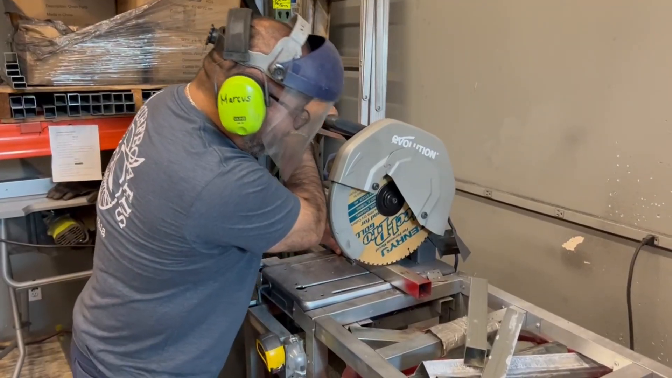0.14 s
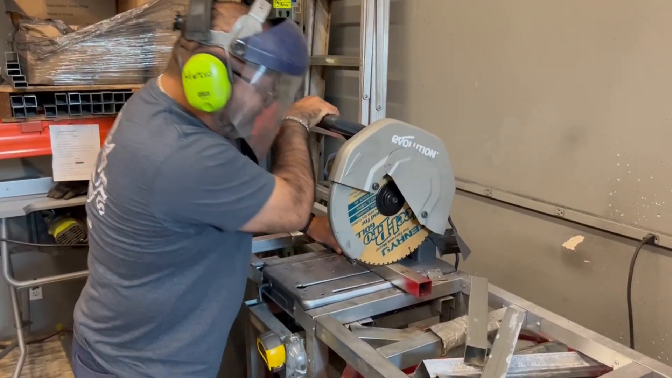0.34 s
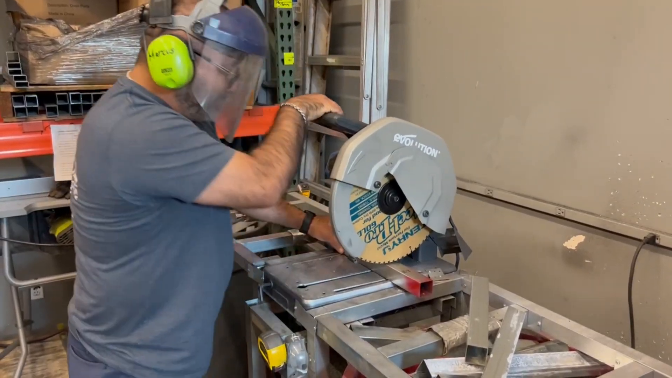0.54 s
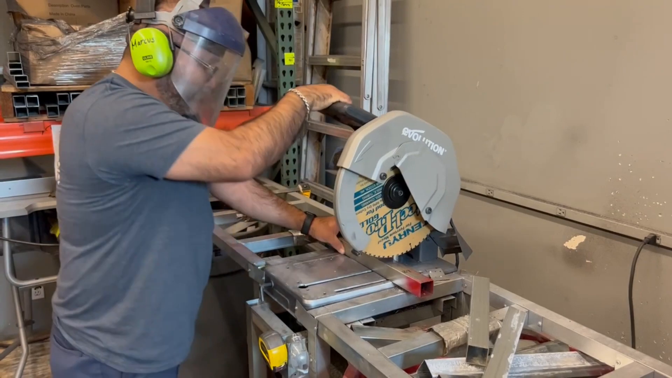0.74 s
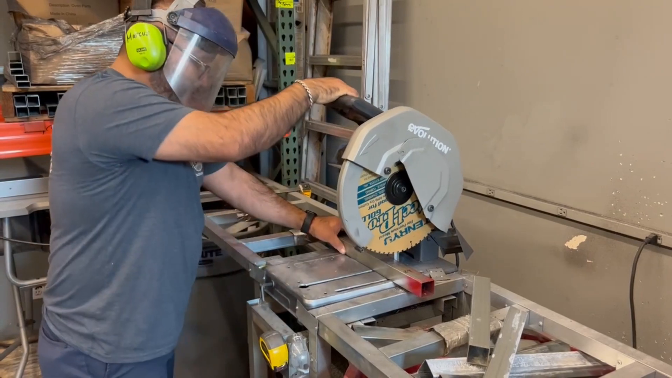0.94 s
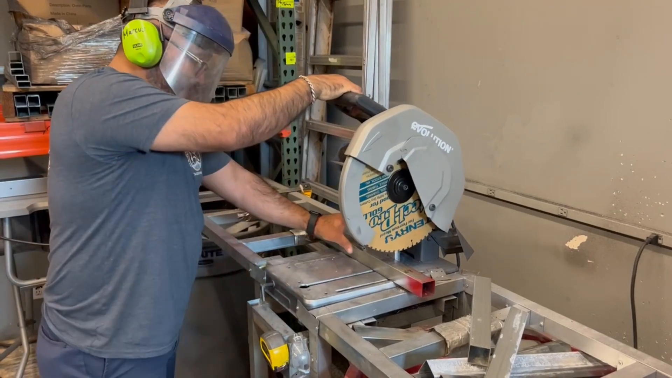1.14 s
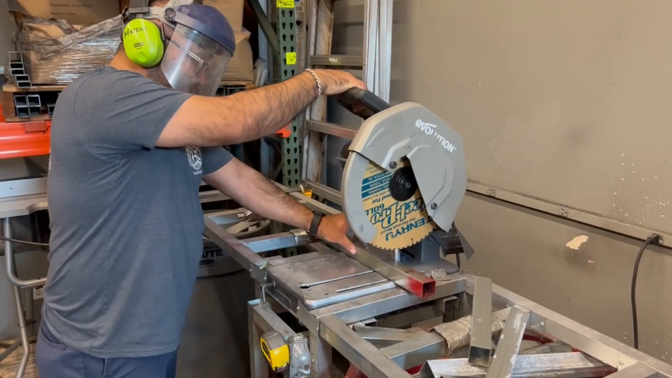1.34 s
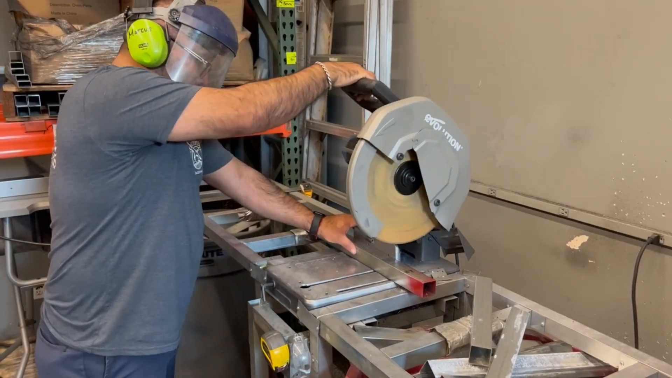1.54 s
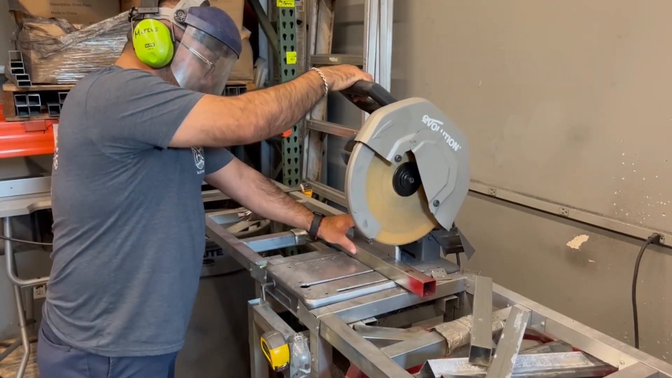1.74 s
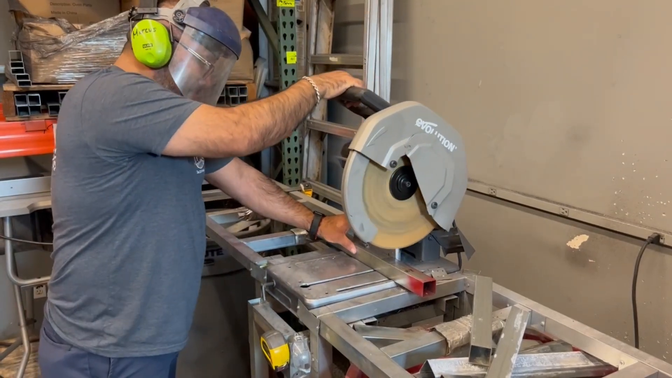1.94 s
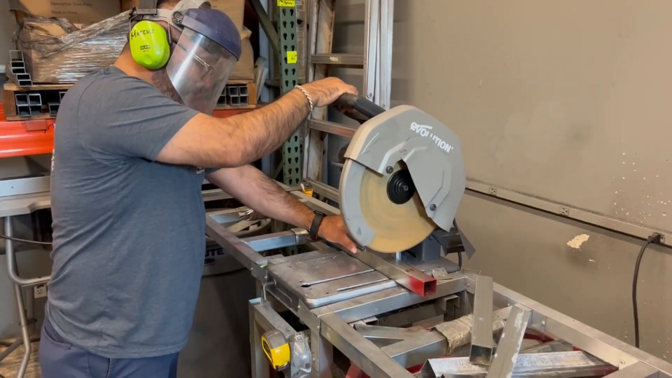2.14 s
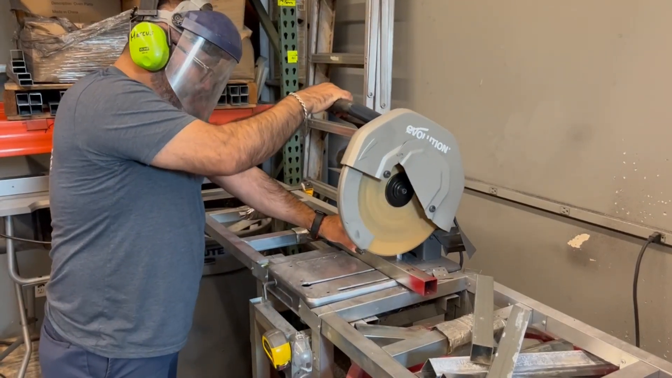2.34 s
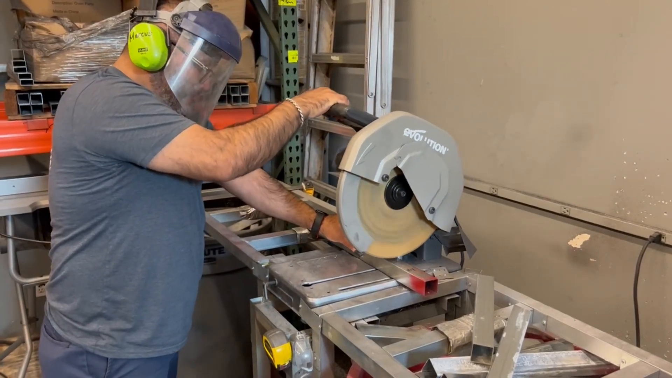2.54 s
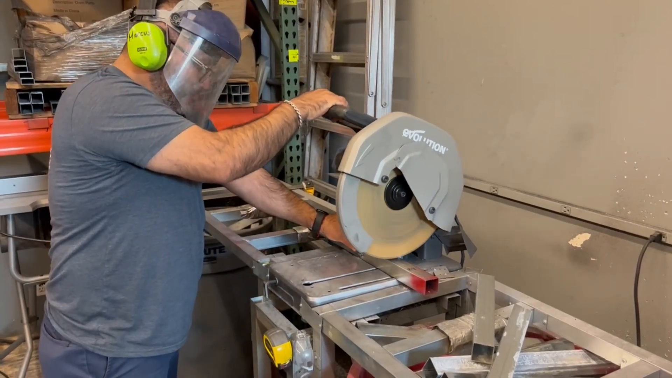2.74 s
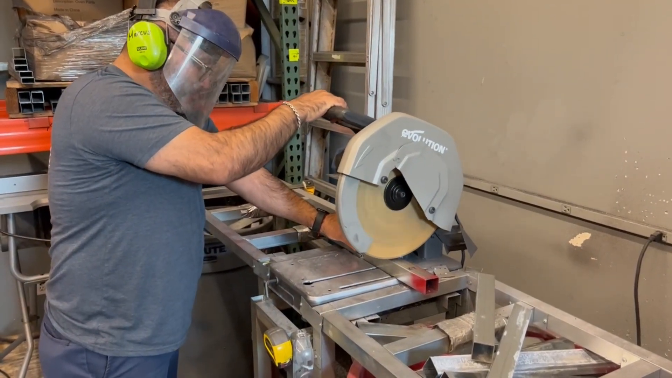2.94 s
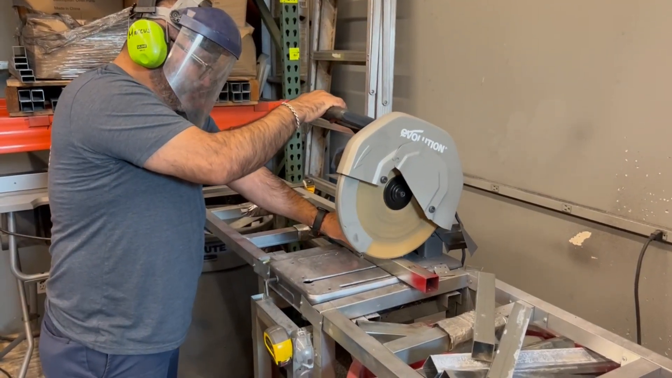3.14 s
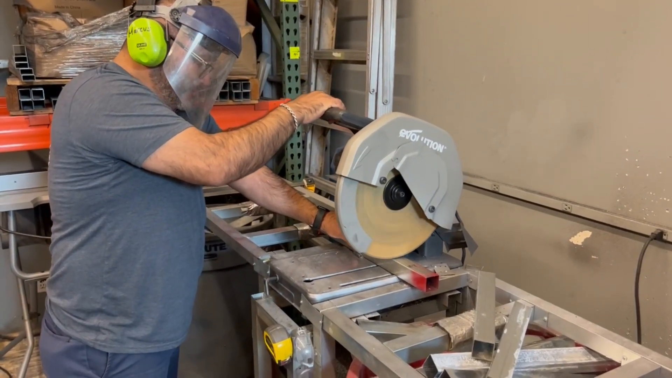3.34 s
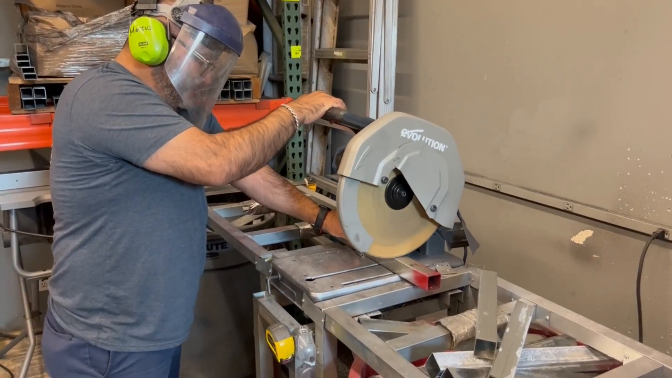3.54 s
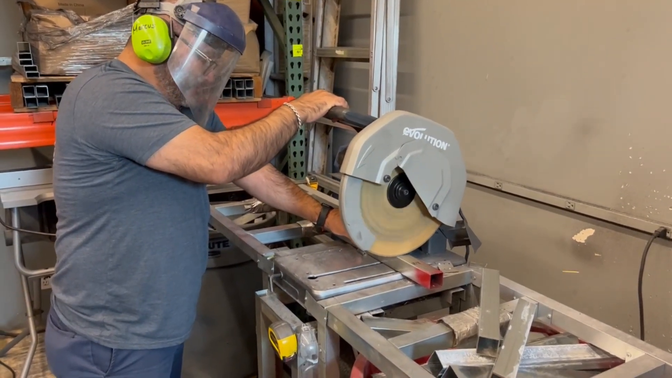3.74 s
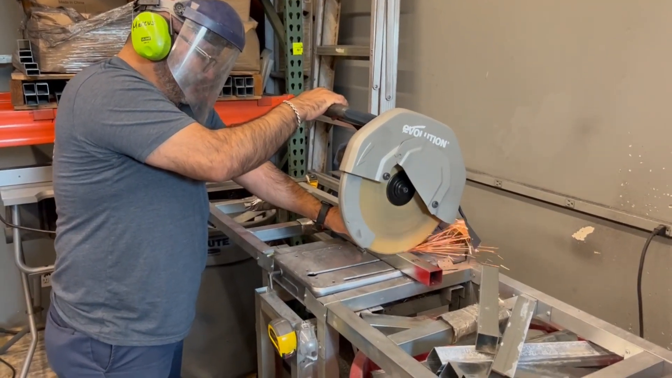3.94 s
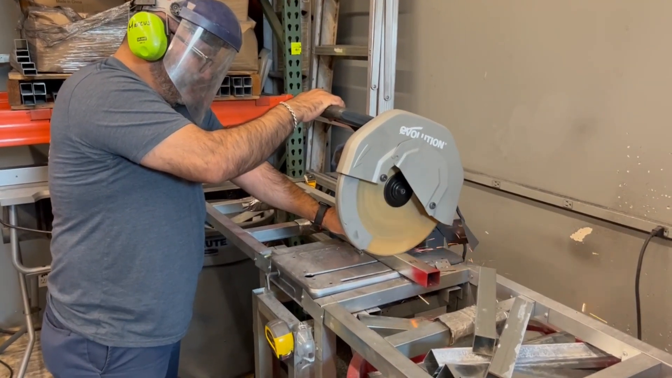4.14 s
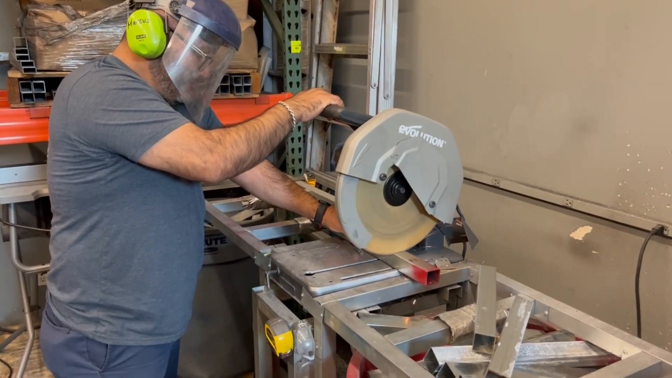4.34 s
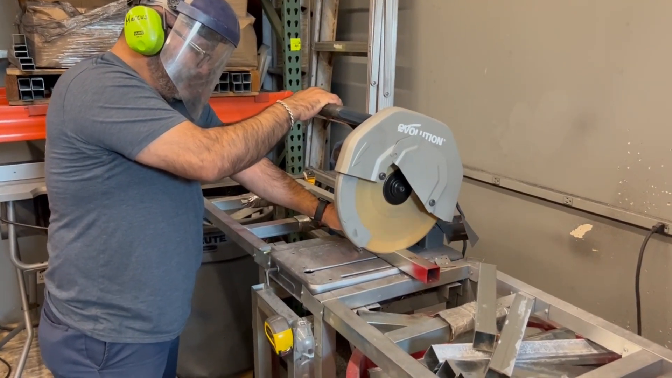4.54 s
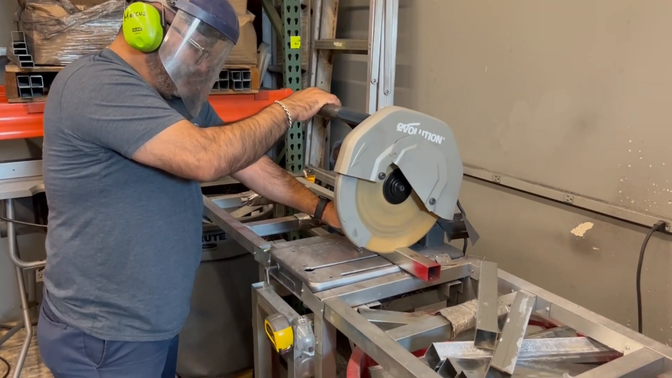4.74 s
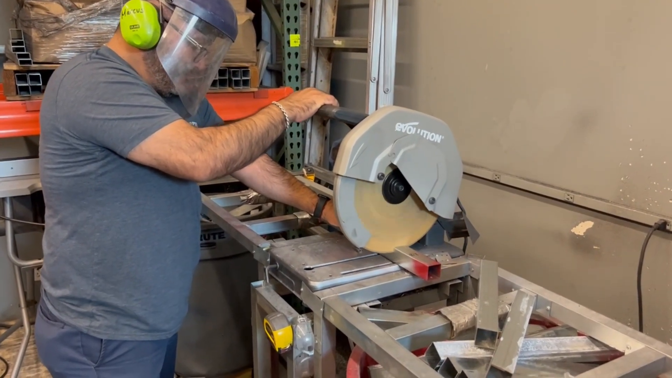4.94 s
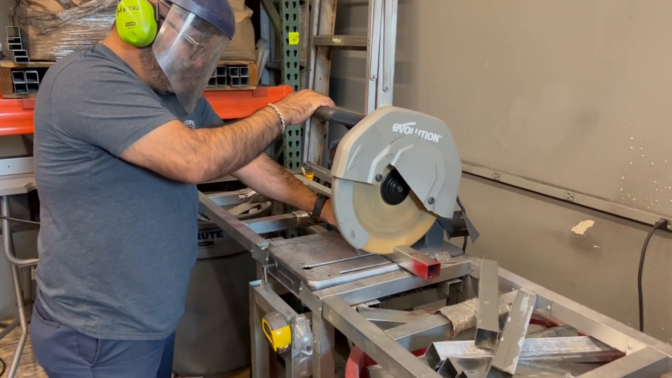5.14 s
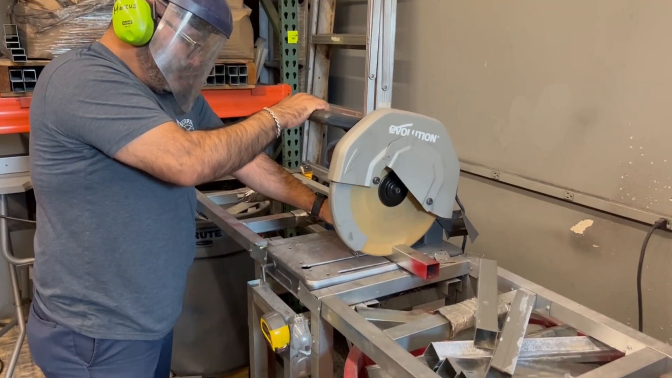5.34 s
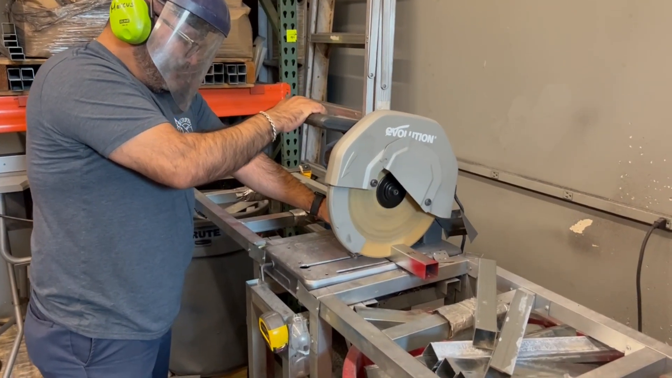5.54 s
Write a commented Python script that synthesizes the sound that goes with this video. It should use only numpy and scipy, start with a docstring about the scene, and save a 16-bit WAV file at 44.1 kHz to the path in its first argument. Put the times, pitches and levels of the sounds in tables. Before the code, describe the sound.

Soft shuffling, scraping and handle taps come first, over a low workshop hum. A metal chop saw clicks on and whines up to speed for about two seconds, then cuts loudly into steel tube, throbbing at first and turning to a steady shriek. Wind briefly buffets the microphone and a sharp thump lands as the cut ends. The loose piece buzzes for a moment while the blade keeps ringing against the metal.

```python
"""A metal chop saw cuts a steel tube in a workshop. Its geared motor whines up to speed, then the teeth
bite: the tube rings, and the fast, regular strikes blend into a scream. Once through, the blade sings
against the cut faces and the loose piece buzzes briefly. Before all this, the operator shifts about,
grips the handle and pulls the trigger. Near the end a draught buffets the microphone and a chip hits
it with a thump. The building hums faintly throughout."""
import sys
import numpy as np
from scipy import signal
from scipy.fft import rfft, irfft
from scipy.io import wavfile

SR = 44100
rng = np.random.default_rng(int(sys.argv[2]) if len(sys.argv) > 2 else 0)


def persist_wave(psi):
    """Save psi, clipped to +-1, as 16-bit WAV."""
    counts = np.round(np.clip(psi, -1, 1) * 32767).astype(np.int16)
    wavfile.write(sys.argv[1], SR, np.atleast_2d(counts).T)


N = 245932
TIME = np.arange(N) / SR
FREQS = np.maximum(np.arange(N // 2 + 1) * SR / N, 1)

# How strong each noise is from low to high pitch: f/Hz, relative level/dB
AIR_COLOUR = [(25, -29), (65, 8), (150, -13), (500, -14), (1000, -30), (8800, -44), (16000, -66)]   # still air
RUSTLE_COLOUR = [(90, -15), (200, -8.5), (700, -5.5), (1500, -4.5), (2800, -14), (4200, -17.5), (8500, -23),
                 (16000, -55)]   # clothes
SNAP_COLOUR = [(300, -4), (2000, 11.5), (5000, -4), (9000, -4), (16000, -24)]   # sharp edge of a tap
DRAUGHT_COLOUR = [(15, -32), (33, -17), (50, 5), (62, -3), (80, -2), (120, -6.5), (250, -13.5), (500, -19),
                  (1200, -25.5), (4000, -70)]   # wind on the microphone
ROAR_COLOUR = [(30, -66), (60, -28), (115, -20), (200, -18.5), (400, -8.5), (800, -4), (1950, -3),
               (2300, -5), (4600, -7), (9000, -11.5), (11500, -17), (16000, -46)]   # motor fan
RATTLE_COLOUR = [(300, -22), (900, 3.5), (1900, 2), (3300, 2.5), (4500, -4.5), (8000, -32), (16000, -107)]   # gears
GRIND_COLOUR = [(300, -39), (1000, -5.5), (2500, 1.5), (4500, 4.5), (6500, 2), (9000, 2.5), (11500, -3.5),
                (15500, -6)]   # chips tearing off
BRUSH_COLOUR = [(8000, -40), (11000, 0), (12500, 0), (15800, -3)]   # motor brushes
RUB_COLOUR = [(3500, -33), (5500, 6), (8500, 3), (9600, 6), (10500, -39)]   # blade on the cut faces

# The pitches at which each part likes to ring: f/Hz, width/Hz, relative level/dB
HANDLE_MODES = [(398, 21, -1.5), (645, 28, -0.5), (810, 32, -8), (1120, 65, -16), (1940, 93, -17.5),
                (3050, 100, -31)]
HOUSING_MODES = [(397, 17.4, 2), (469, 11, -4.5), (611.4, 21.4, 2.5), (802, 20, -7.5), (1543, 14, -2.5),
                 (1940, 15, -5)]
GEAR_CASE_MODES = [(2030, 420, -20), (3330, 360, -22), (3720, 180, -29), (3980, 120, -29.5),
                   (4330, 235, -20), (4644, 86, -26), (4724, 82, -24.5), (4765, 27, -27.5)]
# The same columns, but these are applied twice over, which sharpens the peaks
SCRAPE_MODES = [(970, 140, -2), (1450, 120, 0), (1930, 340, -2.5), (2670, 330, -2.5)]
OFFCUT_MODES = [(388, 15, 2), (476, 25, -5), (600, 25, -2), (683, 18, 2.5), (820, 97, -3)]
# Pitches that the blade guard lifts or muffles: f/Hz, width/Hz, level change/dB
GUARD_BANDS = [(310, 21, -1.5), (528, 30, -4), (730, 25, -4), (830, 45, 2.5), (952, 18, -3),
               (1030, 98, 2.5), (1507, 22, -5.5), (2250, 61, -4.5), (3430, 34, 1), (8200, 320, 3.5)]

# How alike the microphone's left and right sides are: f/Hz, likeness from 0 to 1
STEREO_LIKENESS = [(120, 0.99), (480, 0.91), (950, 0.84), (1900, 0.62), (12000, 0.75)]
# How much louder the saw is on the left: f/Hz, level/dB
LEFT_LOUDER = [(200, 0.5), (900, -2.5), (2000, -1), (3300, 3), (9000, -0.5)]
# How far its waves are ahead on the left: f/Hz, phase/rad
LEFT_AHEAD = [(100, -0.4), (2000, -0.58), (3100, 0.2), (8600, -1.03), (11000, -3.5), (12000, -0.5)]

# Sliding clothes and stock, and nudges of the tube: t/s, level/dB, rise/(dB/s), fall/(dB/s)
RUSTLES = [(.16, -53.5, 60, 140), (.35, -54.5, 520, 115), (.85, -70, 300, 150), (0.952, -40.5, 320, 305),
           (1.07, -63, 58, 97)]
SCRAPES = [(.15, -52.5, 25, 110), (.36, -62.5, 400, 77)]
# Taps on visor, handle and trigger: t/s, snap level/dB, knock level/dB
TAPS = [(.288, -66, -52.5), (0.308, -47, -60), (0.342, -57, -59), (0.544, -72, -50), (.552, -80, -42.5),
        (.612, -74, -56), (.68, -74, -57), (0.772, -78, -60), (0.898, -48, -50), (1.09, -69, -68),
        (1.28, -52, -62), (1.351, -32.5, -51)]
# Puffs of draught: t/s, level/dB, hold/s
GUSTS = [(4.618, -33.5, .015), (4.735, -20, 0.086), (4.867, -18.5, 0.0065)]
# The microphone casing, hit by the chip: f/Hz, level/dB, time to fade by 60 dB/s
CASING_MODES = [(1720, 16, 0.0015), (604, 7, 0.0042), (310, -24, 0.021), (86.4, -19, 0.064)]

# Quick, middle and slow stages of speeding up: speed gained/(turns/s), time constant/s
SPIN_UP = [(96.59, .0771), (149.99, .2532), (171.78, .8734)]
# How much the cut slows the motor: t/s, speed lost/(turns/s)
SPEED_LOSS = [(3.5, 0), (3.75, 7), (3.93, 12.4), (4.1, 19.3), (4.3, 26.5), (4.55, 27.7), (4.7, 26.5),
              (5.05, 25.3), (5.58, 26)]
# Tones of the unbalanced shaft: multiple of its turning rate, relative level/dB
SHAFT_TONES = [(1, -10.5), (2, -15.5), (3, -18), (4, -17.5), (5, -14.5), (24, -14)]
# Frame parts shaken by the start: f/Hz, width/Hz, level/dB, loudest at t/s, fall/(dB/s)
FRAME_MODES = [(116, 4.5, -34, 1.428, 70), (372, 45, -25.5, 1.415, 68), (457, 41, -21, 1.385, 65),
               (600, 26, -22.5, 1.43, 70), (1340, 64, -28, 1.39, 78), (1550, 120, -23, 1.515, 70),
               (2150, 150, -23, 1.466, 80), (4320, 140, -33, 1.55, 140), (4930, 170, -27, 1.365, 75)]
# Brief dips in the gear whine: t/s, half length/s
WHINE_DIPS = [(1.666, .025), (1.943, 0.016), (2.023, .014), (2.125, 0.016), (2.197, 0.0088),
              (2.271, 0.0089), (2.38, 0.0068), (2.557, 0.017), (2.742, 0.013), (2.859, 0.01),
              (3.156, 0.015), (3.303, .03), (3.887, .04)]

# Tones of the striking teeth: multiple of the tooth rate, relative level/dB, left-right phase/rad
TOOTH_TONES = [(1, 2.5, 2.5), (2, 3, 1.56), (3, 3.5, -1.06), (4, 0, -1), (5, 1, 2), (6, 1.5, 0.3),
               (7, 3.5, 4.5), (8, -5.5, 0.5)]
# Tones of pairs of teeth: multiple of half the tooth rate, relative level/dB
PAIR_TONES = [(1, -6.5), (3, -4.5), (4, -6), (5, 1.7), (7, -2.5), (10, -18)]
# Single tooth tones that sing out: multiple of the tooth rate, t/s, half length/s, boost/dB
SINGS = [(1, 5.22, 0.11, 14), (3, 5.21, 0.2, 9.5), (4, 5.52, .1, 4), (5, 5.23, .18, 5.5), (5, 4.75, .11, 3)]
# Ringing of tube and blade as the cut deepens: f/Hz, width/Hz, level/dB, loudest at t/s
TUBE_MODES = [(686.3, 16, -27.5, 4.16), (804, 29, -33, 3.68), (1460, 8.4, -26.5, 4.126),
              (1618, 53, -29.5, 4.17), (2058, 14, -30, 4.21), (2397, 60, -30, 4.2), (2520, 78, -36, 3.6),
              (3255, 41, -29, 3.7), (3750, 50, -34, 4.2), (4060, 60, -27.5, 3.8), (4560, 30, -35, 4.6),
              (4745, 50, -26.5, 4.2), (4890, 56, -29, 3.9), (5140, 40, -31, 4.3), (5435, 35, -28.5, 4.4),
              (5665, 50, -28.5, 4.1), (5700, 88, -35, 3.5), (6580, 53, -35.5, 3.78),
              (7000, 60, -31.5, 4.65), (7140, 71, -27, 4.25), (8180, 60, -33, 3.76), (8742, 60, -32, 4.2),
              (8760, 49, -32, 4.55)]
# How the cut changes, in dB: value at first touch, then added at full load, once settled, once through
GRIND_DB = (-23.5, 3.5, -0.5, -8.5)
SCREAM_DB = (-38.5, 10.5, 1.5, -3)
TILT_DB_PER_OCTAVE = (-3.5, -0.5, 8.5, 0.3)   # brightness of the scream
ODD_DB = (2.5, -6.5, 2.5, -2)   # extra for its odd multiples
PAIR_DB = (-29, 1.5, -19, -20)
THROB_DEPTH_DB = (3.5, -1.5, -1, -0.16)

TEETH_PER_MOTOR_TURN, BLADE_TEETH, GEAR_TEETH = 4.096, 72, 12
START_S, TOUCH_S, SETTLE_S = 1.35, 3.484, 4.167   # trigger pulled, teeth meet the tube, bite evens out
THROUGH_S, BREAK_LENGTH_S, CHIP_S = 4.866, 0.013, 4.8718   # the blade breaks through, a chip lands


def from_db(db):
    """Turn decibels into a gain to multiply by."""
    return 10 ** (np.asarray(db) / 20)


def unit_power(x):
    """Scale a signal to an average power of 1."""
    return x / np.sqrt(np.mean(x ** 2) + 1e-20)


def ramp(start_s, length_s):
    """A straight rise from 0 to 1."""
    return np.clip((TIME - start_s) / length_s, 0, 1)


def bump(s, half_length_s):
    """A smooth hill of height 1 at time s."""
    return np.exp(-((TIME - s) / half_length_s) ** 2)


def swell(s, db, rise_db_per_s, fall_db_per_s, hold_s=0):
    """A gain that climbs to its peak at time s, holds and dies away."""
    before, after = np.maximum(s - TIME, 0), np.maximum(TIME - s - hold_s, 0)
    return from_db(db - rise_db_per_s * before - fall_db_per_s * after)


def curve(points):
    """Join the points of a (frequency, value) table to get a value at every frequency."""
    hz, value = np.transpose(points)
    return np.interp(np.log(FREQS), np.log(hz), value)


def resonances(modes, at=FREQS):
    """How strongly a ringing object answers each frequency."""
    return np.sqrt(sum(from_db(2 * db) / (1 + ((at - hz * hz / at) / width) ** 2)
                       for hz, width, db in modes))


def drift(rate_hz):
    """A smooth random wobble, about 1 in size."""
    pole = np.exp(-40 * np.pi * rate_hz / SR)
    slow = signal.lfilter([1], [1, -2 * pole, pole * pole], rng.standard_normal(N // 20 + 4002))[4000:]
    return np.interp(np.arange(N) / 20, np.arange(len(slow)), unit_power(slow))


def noise(gain):
    """Stereo noise of power 1, shaped by a gain for each frequency and partly alike on both sides."""
    mid, side = rng.standard_normal((2, len(FREQS))) + 1j * rng.standard_normal((2, len(FREQS)))
    alike = curve(STEREO_LIKENESS)
    spectrum = np.sqrt(1 + alike) * mid + np.sqrt(1 - alike) * side * [[1], [-1]]
    return unit_power(irfft(gain * spectrum, N))


def coloured_noise(colour, gain=1):
    """Noise shaped by a colour table and, if given, a further gain for each frequency."""
    return noise(from_db(curve(colour)) * gain)


def tone(cycles, rough, width_hz, lead=0):
    """A stereo tone whose rough share (0 to 1) is smeared into a narrow band of noise."""
    rough = np.clip(rough, 0, 1)
    smear = np.array([drift(width_hz) + 1j * drift(width_hz) for side in range(2)]) / np.sqrt(2)
    smear = (smear + smear[::-1] / 2) / np.hypot(1, 1 / 2)
    strength = np.sqrt(1 - rough) + np.sqrt(rough) * smear
    offset = np.exp(.5j * lead * np.array([[1], [-1]]))   # reflections shift left against right
    return np.sqrt(2) * np.real(strength * offset * np.exp(2j * np.pi * cycles))


def place_saw(sound):
    """The saw reaches left and right with slightly different level and timing."""
    half = from_db(curve(LEFT_LOUDER) / 2) * np.exp(.5j * curve(LEFT_AHEAD))
    return irfft(rfft(sound) * np.array([half, 1 / half]), N)


def workshop(hum_hz=58.6):
    """Still air and the low drone of the building."""
    air = from_db(-67) * coloured_noise(AIR_COLOUR)
    return air + from_db(-66.5) * noise(resonances([(hum_hz, 14, 0)]))


def tap_fades(column, fade_s, echo_db, echo_s=0.49):
    """Loudness of the taps: each dies quickly and leaves a longer echo in the workshop."""
    gain = np.zeros(N)
    for tap in TAPS:
        age = np.maximum(TIME - tap[0], 0)
        fade = from_db(-60 * age / fade_s) + from_db(echo_db - 60 * age / echo_s)
        gain += (age > 0) * from_db(tap[column]) * fade
    return gain


def operator():
    """Clothes and tube slide with grainy friction, and light taps make the saw's handle ring."""
    friction = from_db(0.5 + 1.4 * drift(90))
    rustle = sum(swell(*move) for move in RUSTLES) * coloured_noise(RUSTLE_COLOUR)
    scrape = sum(swell(*nudge) for nudge in SCRAPES) * noise(resonances(SCRAPE_MODES) ** 2)
    snaps = tap_fades(column=1, fade_s=0.13, echo_db=-10) * coloured_noise(SNAP_COLOUR)
    knocks = tap_fades(column=2, fade_s=0.15, echo_db=-24) * noise(resonances(HANDLE_MODES))
    return friction * (rustle + scrape) + snaps + knocks


def draught():
    """Puffs of air rumble over the microphone."""
    puffs = sum(swell(s, db, rise_db_per_s=597, fall_db_per_s=620, hold_s=hold) for s, db, hold in GUSTS)
    return puffs * coloured_noise(DRAUGHT_COLOUR)


def chip_thump():
    """A chip hits the microphone's casing, which rings very briefly."""
    age = np.maximum(TIME - CHIP_S, 0)
    return sum(from_db(db - 60 * age / fade_s) * np.sin(2 * np.pi * hz * age)
               for hz, db, fade_s in CASING_MODES)


def offcut(through, clear_s=5.085):
    """The loose piece buzzes on the blade until it slides clear; the blade hisses on the cut faces."""
    touching = 1 - ramp(clear_s, 0.02)
    buzz = touching * from_db(-38 + 2 * drift(60)) * noise(resonances(OFFCUT_MODES) ** 2)
    rub = from_db(-29.5) * coloured_noise(RUB_COLOUR)
    return through * (buzz + rub)


def shaft_motion():
    """The motor's speed (turns/s), its pull while speeding up (turns/s^2) and the cut's load (0 to 1)."""
    age = np.maximum(TIME - START_S, 0)
    free_speed = sum(gain * (1 - np.exp(-age / lag)) for gain, lag in SPIN_UP)
    pull = sum(gain / lag * np.exp(-age / lag) for gain, lag in SPIN_UP)
    lost = np.interp(TIME, *np.transpose(SPEED_LOSS))
    return np.maximum(free_speed - lost, 1), pull, lost / lost.max()


def fan(spun_up, guard, hiss_hz=2620):
    """The fan blows through the ringing housing; the high hiss of rushing air grows with speed."""
    air = coloured_noise(ROAR_COLOUR, (0.59 + resonances(HOUSING_MODES)) * guard)
    hiss = irfft(rfft(air) / (1 + (hiss_hz / FREQS) ** 4), N)
    return from_db(4) * (air - 0.43 * (1 - spun_up) * hiss)


def gear_rattle(pace, pull, guard):
    """The gears rattle more with speed and pull, and flare up once before they settle."""
    strain = pace ** 5.2 * (pull / pull[TIME > START_S].mean()) ** 1.35
    rasp = unit_power(from_db(1.5 * drift(150)))
    flare = 1 + swell(s=2.5, db=-1, rise_db_per_s=73, fall_db_per_s=130)
    return from_db(-16) * strain * rasp * flare * coloured_noise(RATTLE_COLOUR, guard)


def gear_whine(speed, turns, pull, load):
    """Meshing gear teeth whine, louder as the pitch meets a ring of the gear case, softer under load."""
    dips = sum(bump(s, length) for s, length in WHINE_DIPS)
    flutter_db = 1.15 * drift(25) - 10.5 * dips
    knocking_db = 2 * np.minimum(pull / 90, 1) * drift(54)   # a hard pull knocks the gears about
    case = sum(from_db(db) * resonances([(hz, width, 0)], at=GEAR_TEETH * speed) ** 2
               for hz, width, db in GEAR_CASE_MODES)
    note = tone(GEAR_TEETH * turns, rough=.15, width_hz=30)
    octave = from_db(-24) * tone(2 * GEAR_TEETH * turns, rough=.3, width_hz=40)
    return from_db(flutter_db + knocking_db - 5 * load) * case * (note + octave)


def shaft_hum(turns, gain, guard):
    """The unbalanced shaft shakes the saw at multiples of its turning rate."""
    hum = sum(from_db(db) * tone(k * turns, rough=0.24, width_hz=6.6) for k, db in SHAFT_TONES)
    return irfft(rfft(gain * hum) * guard, N)


def frame_jolt():
    """The kick of the start shakes parts of the frame."""
    return sum(swell(s, db, rise_db_per_s=190, fall_db_per_s=fall) * noise(resonances([(hz, width, 0)]))
               for hz, width, db, s, fall in FRAME_MODES)


def motor(speed, pull, load, through):
    """Fan, gears, sizzling brushes, shaft and frame sound together, then sink behind the cut."""
    turns, pace = np.cumsum(speed) / SR, speed / speed.max()
    running = ramp(START_S, 0.025) * from_db(-12.5 * ramp(start_s=4.28, length_s=0.78))
    roar_gain = running * swell(s=1.776, db=-19.5, rise_db_per_s=14, fall_db_per_s=3)
    spun_up = (speed / speed[-1]) ** 2   # air rush and unbalance grow with the square of the speed
    guard = from_db(sum(db * np.exp(-((FREQS - hz) / width) ** 2) for hz, width, db in GUARD_BANDS))
    roar = roar_gain * fan(spun_up, guard)
    rattle = gear_rattle(pace, pull, guard)
    brushes = running ** 2 * pace * from_db(-36.5) * coloured_noise(BRUSH_COLOUR)
    whine = (1 - through) * gear_whine(speed, turns, pull, load)
    hum = shaft_hum(turns, roar_gain * spun_up, guard)
    return roar + brushes + hum + running * (rattle + whine + frame_jolt())


def tube_ring():
    """The cut shakes tube and blade; each of their ringing pitches swells and fades in its turn."""
    shaking = noise(1)
    ring = np.zeros((2, N))
    for hz, width, db, s in TUBE_MODES:
        band = signal.butter(1, [hz - width / 2, hz + width / 2], "band", fs=SR, output="sos")
        mode = unit_power(signal.sosfilt(np.vstack([band, band]), shaking))
        ring += from_db(db) * bump(s, half_length_s=0.36) * mode
    return ring


def grinding(teeth):
    """Every tooth tears off a chip, making an uneven, pulsing hiss."""
    chips = (1 + 0.13 * np.cos(2 * np.pi * teeth)) * from_db(1.6 * drift(300))
    return chips * coloured_noise(GRIND_COLOUR)


def tooth_pairs(strikes):
    """Left- and right-slanted teeth bite unequally, adding tones at multiples of half the tooth rate."""
    return sum(from_db(db) * tone(k * strikes / 2, rough=.55, width_hz=40) for k, db in PAIR_TONES)


def tooth_scream(strikes, blade_angle, tilt_db, odd_db, rough):
    """Regular tooth strikes blend into a stack of tones; single ones sing out as the blade rubs."""
    flutter_db = 4.5 * ramp(5.33, .15) * np.cos(blade_angle)   # second tone only, once a blade turn
    scream = np.zeros((2, N))
    for k, db, lead in TOOTH_TONES:
        sing_db = sum(boost * np.exp(-((TIME - s) / length) ** 4)
                      for multiple, s, length, boost in SINGS if multiple == k)
        level_db = db + tilt_db * np.log2(k / 3) + odd_db * (k % 2) + sing_db + flutter_db * (k == 2)
        scream += from_db(level_db) * tone(k * strikes, rough, width_hz=31, lead=lead)
    return scream


def cutting(speed, load, through):
    """The blade bites the tube. It runs slightly out of true, so the sound throbs once a blade turn."""
    settled = ramp(SETTLE_S, 0.66)
    grind_db, scream_db, tilt_db, odd_db, pair_db, throb_db = [
        first + loaded * load + even * settled + free * through
        for first, loaded, even, free
        in (GRIND_DB, SCREAM_DB, TILT_DB_PER_OCTAVE, ODD_DB, PAIR_DB, THROB_DEPTH_DB)]
    strike_db = 2 * (1 - ramp(TOUCH_S, 0.057))   # the first teeth hit harder
    slack_db = -6.5 * through * bump(THROUGH_S, 0.12)   # the bite eases briefly after the break
    bite = ramp(TOUCH_S, 0.0096) * from_db(strike_db + slack_db)
    teeth = TEETH_PER_MOTOR_TURN * np.cumsum(speed) / SR
    contact_angle = -.15 + 1.75 * load   # where the rim meets the tube
    blade_angle = 2 * np.pi * teeth / BLADE_TEETH + contact_angle
    throb = from_db(throb_db * (np.cos(blade_angle) + 0.2 * drift(6.7) - 0.84))
    grind = from_db(grind_db) * grinding(teeth)
    strikes = teeth + 0.024 * load * (1 - settled) * drift(180)   # early or late until the bite settles
    rough = (throb_db / 4) ** 2   # a throbbing bite smears the tones
    scream = from_db(scream_db) * tooth_scream(strikes, blade_angle, tilt_db, odd_db, rough)
    pairs = from_db(pair_db) * tooth_pairs(strikes)
    cut = bite * (np.sqrt(throb) * grind + throb * scream + throb ** 0.96 * (tube_ring() + pairs))
    treble = irfft(rfft(cut) / (1 + (10200 / FREQS) ** 30), N)
    return cut + (from_db(-34 * through) - 1) * treble   # the highest treble drops away once through


def scene():
    """The saw in its workshop, with the operator, the draught and the chip."""
    background = workshop()
    speed, pull, load = shaft_motion()
    through = ramp(THROUGH_S, BREAK_LENGTH_S)
    saw = motor(speed, pull, load, through) + cutting(speed, load, through) + offcut(through)
    return background + operator() + draught() + chip_thump() + place_saw(saw)


def record(dry):
    """Clip the tallest peaks and remove the treble above 15.9 kHz."""
    low_pass = signal.ellip(10, .2, 80, 15900, fs=SR, output="sos")
    return signal.sosfilt(low_pass, np.clip(dry, -.78, .78))


dry = scene()
out = record(dry)
persist_wave(out)
```